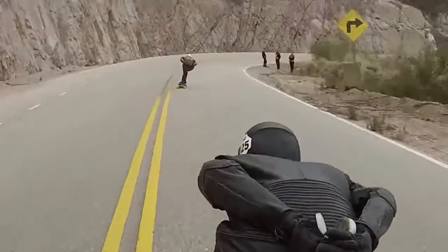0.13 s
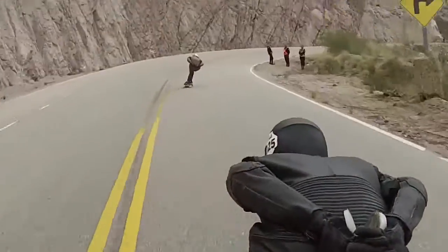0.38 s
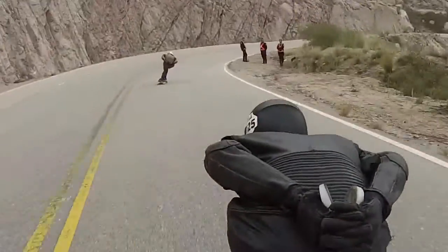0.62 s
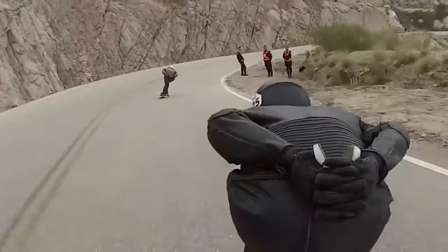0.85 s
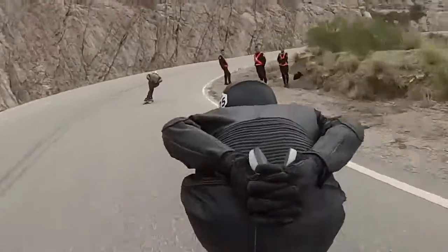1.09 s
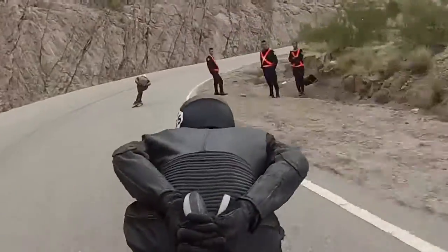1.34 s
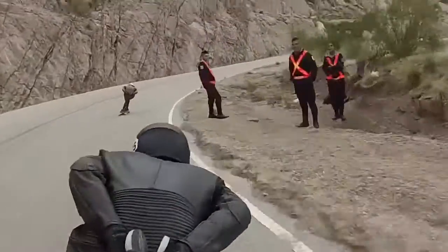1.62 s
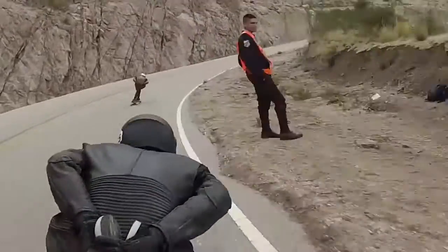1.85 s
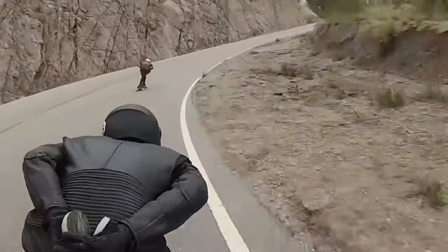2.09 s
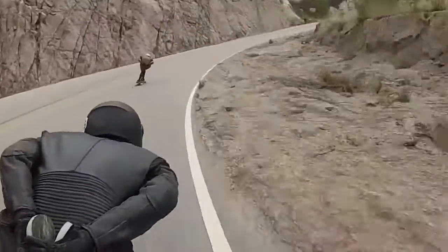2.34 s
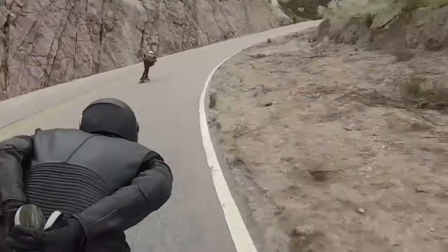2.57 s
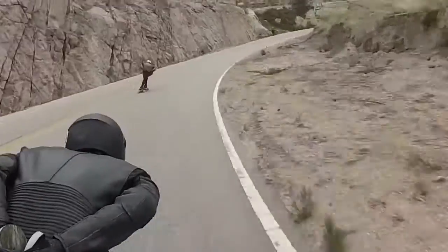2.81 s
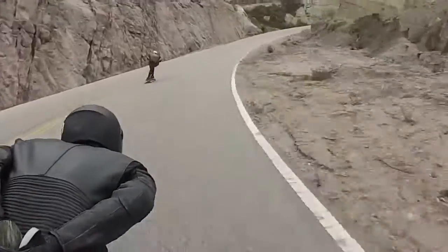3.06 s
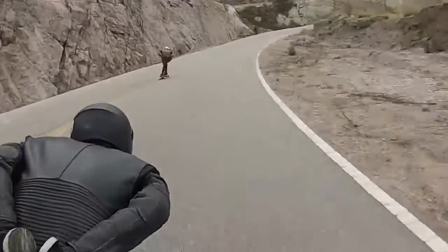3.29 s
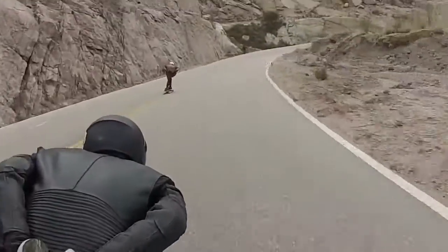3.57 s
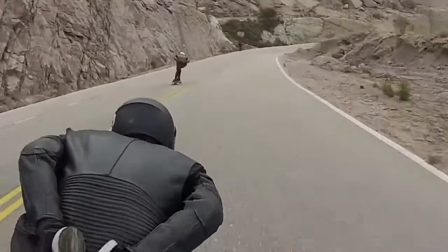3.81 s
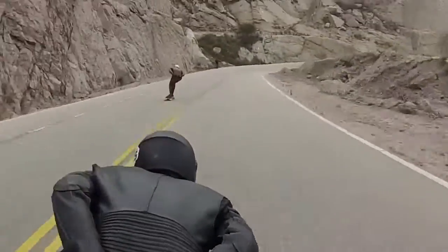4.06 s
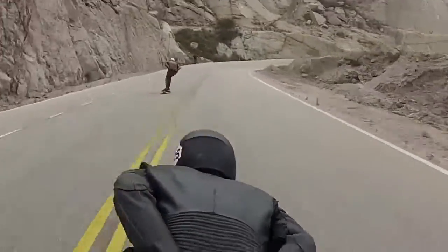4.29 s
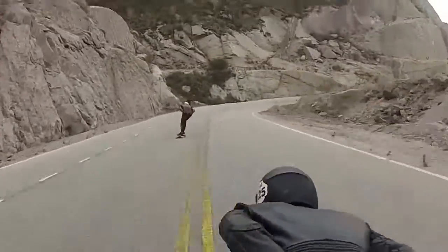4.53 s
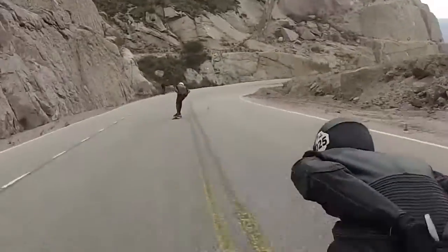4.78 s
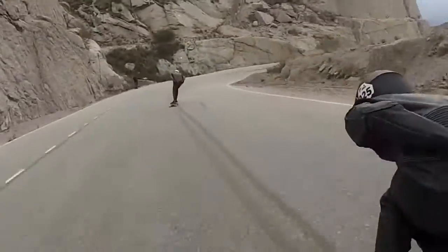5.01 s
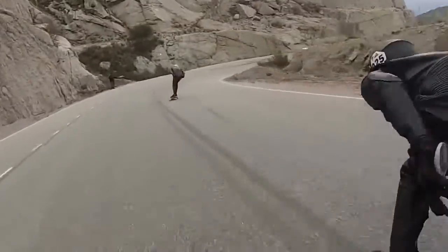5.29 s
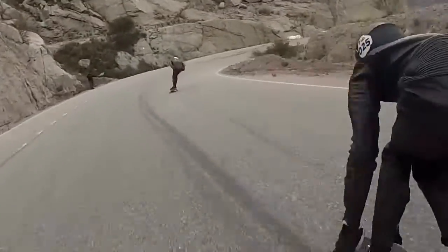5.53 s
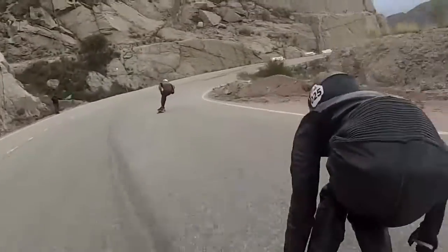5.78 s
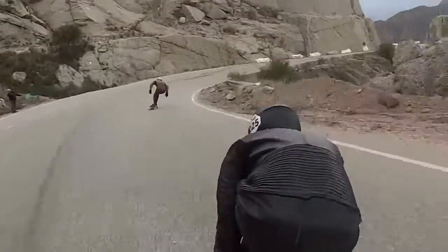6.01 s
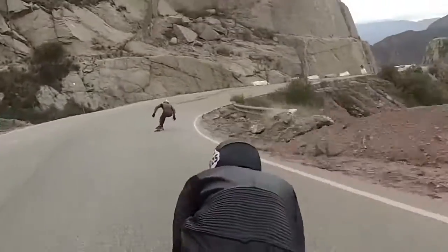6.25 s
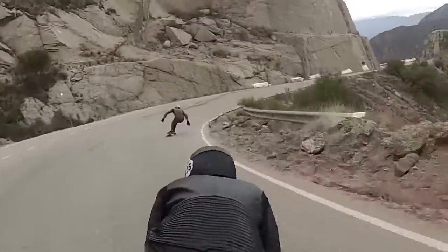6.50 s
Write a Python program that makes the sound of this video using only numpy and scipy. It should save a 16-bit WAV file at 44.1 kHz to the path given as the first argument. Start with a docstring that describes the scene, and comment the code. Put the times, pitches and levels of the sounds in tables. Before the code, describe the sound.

Skateboard wheels hiss and drone fast down rough asphalt while wind roars over an encased camera, with one sharp click and a brief squeal.

```python
"""A camera in a closed case rides downhill behind a skateboarder. From the start wind buffets the case, rushes
past and roars in its air cavity, while the wheels drone through the deck and hiss on rough asphalt, all as
shaped noise; bumps and cracks swell them throughout. At about 1.6 s a bit of grit strikes the case, a noise
burst with ringing modes; gain control ducks ahead of the blow and creeps back. At about 4.6 s a wheel slips
sideways and squeals twice, as rough gliding tones."""
import sys
import numpy as np
from scipy import signal
from scipy.fft import rfft, irfft, next_fast_len
from scipy.io import wavfile
from scipy.ndimage import uniform_filter1d, minimum_filter1d, map_coordinates

SR = 44100
rng = np.random.default_rng(int(sys.argv[2]) if len(sys.argv) > 2 else 0)


def magnitude_from_level(level_db):
    """Linear magnitude for a level in decibels (20 dB per decade)."""
    exponent = np.asarray(level_db, float) / 20
    return 10 ** exponent


def unload_wav(signal):
    """Save mono or channel-first audio to the path in sys.argv[1] as 16-bit WAV at rate SR, clipped to [-1, 1]."""
    wavfile.write(
        sys.argv[1],
        SR,
        np.round(np.clip(np.atleast_2d(signal).T, -1, 1) * 32767).astype(np.int16),
    )


N = 292191  # length in samples


def unit(x):
    """Normalization: scale to rms 1."""
    return x / np.sqrt(np.mean(x ** 2) + 1e-20)


def along(points, hz):
    """Spectral envelope: (Hz, dB) points on a log axis, falling 40 dB per octave past the last."""
    f, v = np.transpose(points)
    octaves_beyond = np.log2(np.maximum(hz / f[-1], 1))
    return np.interp(np.log(hz + 1), np.log(f + 1), v) - 40 * octaves_beyond


def curves(rows):
    """Linear interpolation: one value per sample for each column after the time."""
    s, *columns = np.transpose(rows)
    return [np.interp(np.arange(N) / SR, s, column) for column in columns]


def wobble(rate):
    """Slow random modulation: a smooth curve through rate random knots a second."""
    knots = rng.standard_normal(int(N * rate / SR) + 4)
    return map_coordinates(knots, [np.arange(N) * rate / SR])


def coloured(x, gain_db):
    """Linear filtering: a gain in dB that depends on frequency, then scaling to rms 1."""
    m = next_fast_len(N + 8192)
    spectrum = rfft(x, m) * magnitude_from_level(gain_db(np.fft.rfftfreq(m, 1 / SR)))
    return unit(irfft(spectrum, m)[:N])


def patchy(depth_db):
    """Non-stationary noise: white noise whose strength varies in patches of time and frequency."""
    z = signal.stft(rng.standard_normal(N + 512), nperseg=512)[2]
    field = rng.standard_normal(z.shape)
    field = uniform_filter1d(field, size=8, axis=0)
    field = uniform_filter1d(field, size=8, axis=1)
    return signal.istft(z * magnitude_from_level(depth_db * unit(field)), nperseg=512)[1][:N]


def tilted(x, slope_db, pivot_hz):
    """Spectral tilt: a time-varying slope in dB per octave about a pivot, up to two octaves each way."""
    hz, t, z = signal.stft(x, SR, nperseg=512)
    slope = np.interp(t, np.arange(N) / SR, slope_db)
    octaves = np.log2((hz[:, None] + 1) / pivot_hz).clip(-2, 2)
    return signal.istft(z * magnitude_from_level(octaves * slope), nperseg=512)[1][:N]


# Bending resonance of the deck. Each row: frequency in Hz, relative level in dB per Hz.
DECK = [(60, -15.5), (85, -12), (105, -3), (120, 0.5), (135, -6.5), (170, -17.5), (260, -72)]


def deck_drone(drone_db):
    """Forced vibration: road texture shakes the deck at its bending resonance."""
    shaken = magnitude_from_level(0.62 * wobble(5.7)) * rng.standard_normal(N)
    return magnitude_from_level(drone_db) * coloured(shaken, lambda hz: along(DECK, hz))


# Peaks and dips that the case lays on the hiss. Each row: centre in Hz, width in Hz, height in dB.
CASE = [(2565, 253, -7), (2755, 83, 4), (3713, 106, -4), (4040, 180, -3), (4090, 160, -3.5),
        (4400, 210, -2), (4946, 210, -7.5), (5400, 360, 5.5), (6290, 340, -5.5), (6487, 194, 9),
        (7100, 620, 3.5), (8100, 590, -4), (9100, 790, 2), (10820, 840, -5), (11400, 350, 4),
        (11980, 860, -5.5), (13000, 260, -3), (13600, 280, -2.5)]


def case_db(hz):
    """Transmission response: the sum in dB of bell-shaped peaks and dips."""
    return sum(db / (1 + (2 * (hz - centre) / width) ** 2) for centre, width, db in CASE)


# Hiss of the contact patch. Each row: frequency in Hz, relative level in dB per Hz.
HISS = [(1200, -58), (1900, -2), (2400, -2), (4000, -2), (6000, -10), (8000, -19), (11000, -22),
        (13000, -30.5), (15200, -42)]


def tyre_hiss(hiss_db, gust):
    """Contact noise: texture excites broadband hiss, louder and brighter on a rougher stretch."""
    texture = magnitude_from_level(0.56 * gust + 0.23 * wobble(13) + 0.71 * wobble(45) + 0.84 * wobble(300))
    hiss = coloured(texture * patchy(depth_db=0.37), lambda hz: along(HISS, hz) + case_db(hz))
    slope_db = 0.51 * (hiss_db - hiss_db.mean())  # dB per octave
    return magnitude_from_level(hiss_db) * tilted(hiss, slope_db, pivot_hz=3900)


# Coarseness of the asphalt under the wheels. Each row: time in seconds, hiss level in dB
# before the cracks and the tilt.
ROAD = [(0, -36), (.5, -34.5), (1.0, -35), (1.5, -35), (1.8, -33.5), (2.05, -35.5), (2.45, -32.5),
        (2.7, -34), (3.6, -34), (3.95, -35.5), (4.42, -36), (4.62, -32.5), (4.75, -31), (4.88, -31),
        (4.96, -31.5), (5.2, -32), (5.52, -33), (5.63, -30.5), (6.1, -31.5), (6.63, -31)]


def coarseness():
    """Roughness excitation: coarser asphalt gives a stronger hiss."""
    return curves(ROAD)[0]


# Bumpy stretches that shake deck and camera. Each row: middle in seconds, length in seconds,
# swell of the drone in dB.
BUMPS = [(.03, .1, 6.5), (0.706, 0.22, 4.5), (1.226, 0.17, 6.5), (1.415, 0.084, 9), (1.66, 0.12, 3.5),
         (2.233, 0.15, 9.5), (2.45, 0.27, 5), (3.102, 0.27, 3), (3.426, .12, 4), (3.65, 0.16, 4.5),
         (4.196, 0.1, 1), (4.807, 0.2, 7.5), (5.18, .2, 9.5), (5.63, 0.09, 7), (5.9, 0.17, 4.5),
         (6.174, .1, 3), (6.6, 0.17, 5)]


def shaking():
    """Amplitude modulation: each bump is a bell-shaped swell in dB."""
    t = np.arange(N) / SR
    return sum(db * np.exp(-(2 * (t - s) / length) ** 2) for s, length, db in BUMPS)


# Cracks in the asphalt that the wheels cross. Each row: time in seconds, rise of the hiss in dB.
CRACKS = [(0.728, 2), (1.111, 5), (1.202, 6), (1.297, 4), (1.322, 5), (2.8714, 3), (2.9184, 2.5),
          (3.5024, 1), (4.1084, 4), (4.729, 2), (5.5903, 4.5), (6.0894, 0), (6.4144, 1)]


def cracks():
    """Impulsive excitation: a sudden rise in dB at each crack, fading exponentially."""
    t, fade_s = np.arange(N) / SR, 0.0049
    return sum(db * (t >= s) * np.exp(-np.abs(t - s) / fade_s) for s, db in CRACKS)


# The blow of grit. Each row: time in seconds, strength in dB.
GRIT = [(1.5725, 2.5)]
# Modes of the struck shell. Each row: frequency in Hz, level in dB at strength 0 dB,
# 60 dB decay time in seconds.
SHELL = [(1900, -20, .01), (2350, -21, 0.023), (3000, -11.5, .012), (3400, -18, 0.0099), (3680, -9, 0.0083),
         (4180, -8.5, 0.0094), (4260, -12, 0.013), (4730, -12, 0.016), (5330, -20, 0.014),
         (5900, -14.5, 0.0087), (6800, -8, 0.0096), (7630, -9, 0.0099), (8540, -16.5, 0.0071),
         (10160, -8, 0.0031), (11850, -8, 0.0045), (12800, -7.5, 0.0046), (14100, -13, 0.0034),
         (15000, -17, 0.004)]


def grit():
    """Modal synthesis: a noisy crack of a few milliseconds and shell modes, the lowest building slowest."""
    out, t = np.zeros(N + SR), np.arange(SR // 20) / SR
    for s, strength_db in GRIT:
        ring = np.zeros(len(t))
        for k, (hz, level, t60) in enumerate(SHELL):
            decay = magnitude_from_level(level - 60 * t / t60)
            onset = 1 - np.exp(-t * hz / 2.9)
            ring += (-1) ** k * decay * onset * np.sin(2 * np.pi * hz * t)
        crack = magnitude_from_level(-18.0 - 60 * t / .009) * rng.standard_normal(len(t))
        out[round(s * SR):][:len(t)] += magnitude_from_level(strength_db) * (ring + crack)
    return out[:N]


# Brief squeals of a wheel slipping sideways. Each row: start in seconds, length in seconds,
# start frequency in Hz, end frequency in Hz, level in dB about which it wobbles.
SQUEAL = [(4.597, 0.057, 5500, 5220, -28), (4.655, 0.068, 5400, 5600, -36)]


def squeals():
    """Friction tone: a gliding pitch with random phase and level, under a half-sine swell."""
    t, out = np.arange(N) / SR, np.zeros(N)
    for s, length, start_hz, end_hz, db in SQUEAL:
        progress = np.clip((t - s) / length, 0, 1)
        pitch_hz = start_hz + (end_hz - start_hz) * progress
        phase = 2 * np.pi * np.cumsum(pitch_hz) / SR
        level = magnitude_from_level(db + 3 * wobble(150))
        out += level * np.sin(np.pi * progress) * np.sin(phase + 1.3 * wobble(200))
    return out


# Roar of the air cavity. Each row: frequency in Hz, relative level in dB per Hz.
CAVITY = [(1000, -25.5), (1250, -23), (1400, -6), (1520, 0.5), (1650, -3), (1900, -6), (2100, -13.5),
          (2600, -14), (4000, -81)]


def cavity_roar(roar_db, gust):
    """Cavity resonance: fluttering eddies blow across the air cavity of the case."""
    eddies = magnitude_from_level(0.33 * gust + 0.97 * wobble(70)) * patchy(depth_db=0.13)
    return magnitude_from_level(roar_db) * coloured(eddies, lambda hz: along(CAVITY, hz))


# Wind pressing on the case. Each row: frequency in Hz, relative level in dB per Hz.
BUFFET = [(8, -8), (22, 1), (40, 9), (55, 1), (75, 2), (110, -4.5), (200, -42)]


def wind_buffet(buffet_db):
    """Turbulent pressure fluctuation: eddies thump the case at low frequency."""
    thumps = magnitude_from_level(0.51 * wobble(22)) * rng.standard_normal(N)
    return magnitude_from_level(buffet_db) * coloured(thumps, lambda hz: along(BUFFET, hz))


# Air rushing past the case. Each row: frequency in Hz, relative level in dB per Hz.
RUSH = [(90, -23), (170, 0.5), (210, -0.5), (320, -7), (600, -12), (850, -44), (1200, -11.5), (1600, -17),
        (2500, -43)]


def air_rush(rush_db, gust):
    """Flow noise: eddies rush past the case and flutter with the gusts."""
    eddies = magnitude_from_level(0.28 * gust) * patchy(depth_db=-0.7)
    return magnitude_from_level(rush_db) * coloured(eddies, lambda hz: along(RUSH, hz))


# Airflow over the case. Each row: time in seconds, cavity roar in dB, turbulence in dB,
# both before the random drift and the jolts.
AIR = [(0, -30, -42), (.33, -31.5, -44.5), (.7, -28.5, -47), (1.0, -31, -44), (1.12, -27.5, -35),
       (1.23, -30.5, -32), (1.32, -28, -45), (1.5, -28.5, -43), (1.9, -30, -38.5), (2.2, -30, -41),
       (2.8, -30, -39.5), (3.3, -29, -45), (4.0, -30, -41.5), (4.5, -31, -51), (4.75, -31.5, -41),
       (5.05, -28.5, -41), (5.55, -28.5, -46.5), (5.75, -27.5, -45), (6.2, -28, -41), (6.4, -28.5, -38.5),
       (6.63, -26.5, -44)]


def airflow():
    """Flow excitation: the strengths of cavity roar and turbulence over time."""
    return curves(AIR)


def scene():
    """Superposition: road, airflow and bumps set the levels; roar, rush and hiss share the gusts."""
    road_db, (roar_db, turbulence_db) = coarseness(), airflow()
    shake_db, jolt_db, gust = shaking(), cracks(), wobble(15)
    # plain factors below are dB per dB of shaking, coarseness, turbulence or jolt
    buffet_db = turbulence_db + 0.27 * shake_db + 1.4 * wobble(5)
    rush_db = -47 + 0.43 * (road_db - road_db.mean()) + 0.25 * shake_db
    rush_db = rush_db + 0.2 * (turbulence_db - turbulence_db.mean()) + 0.71 * wobble(5.6)
    roar_db = roar_db + 0.57 * wobble(5.94) + 0.72 * jolt_db
    drone_db = -39.5 + shake_db
    wheels = deck_drone(drone_db) + tyre_hiss(road_db + jolt_db, gust)
    wind = cavity_roar(roar_db, gust) + wind_buffet(buffet_db) + air_rush(rush_db, gust)
    return (wheels + grit() + squeals() + wind)[None]


def gain_control(x, ceiling_db, hold, recover_db):
    """Look-ahead limiting: gain drops before a loud peak, holds, then climbs recover_db a second."""
    t, ahead = np.arange(N) / SR, .018  # seconds
    level_db = 10 * np.log10(np.abs(uniform_filter1d(x ** 2, size=130)) + 1e-12)
    need = np.minimum(ceiling_db - level_db, 0)
    held = minimum_filter1d(need, size=round(hold * SR))
    held = np.interp(t + ahead - hold / 2, t, held)  # start the drop ahead of the peak
    climbing = np.minimum(recover_db * t + np.minimum.accumulate(held - recover_db * t), 0)
    return x * magnitude_from_level(uniform_filter1d(climbing, size=90))


def band_limit(x):
    """A steep low-pass at the top of the band."""
    return signal.sosfilt(signal.butter(12, 16500, fs=SR, output="sos"), x)


def record(dry):
    """Dynamic range control and band limiting: look-ahead gain, then a steep low-pass."""
    ducked = gain_control(dry[0], ceiling_db=-17.5, hold=.17, recover_db=24)
    m, top_hz = next_fast_len(N + 8192), 15130
    # 1 dB of loss per 10 Hz above the top, at most 60 dB
    loss_db = np.clip((np.fft.rfftfreq(m, 1 / SR) - top_hz) / 10, 0, 60)
    limited = irfft(rfft(ducked, m) * magnitude_from_level(-loss_db), m)[:N]
    return band_limit(limited[None])


dry = scene()
out = record(dry)
unload_wav(out)
```